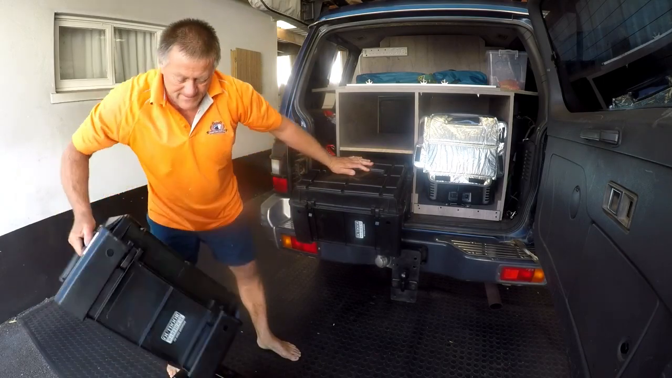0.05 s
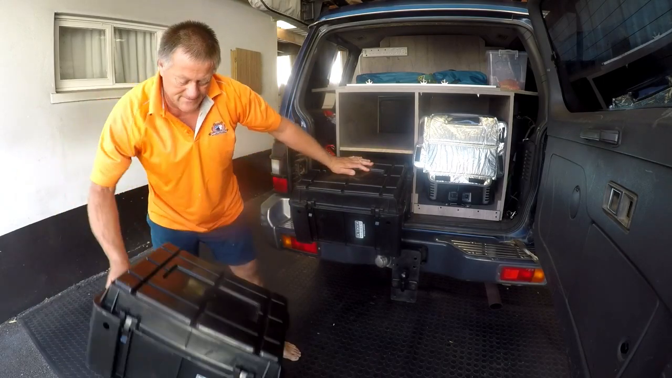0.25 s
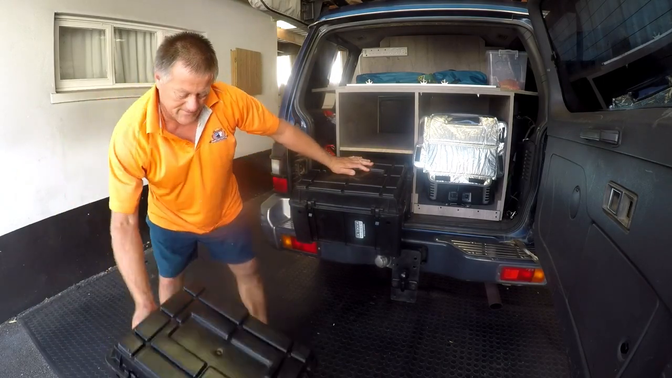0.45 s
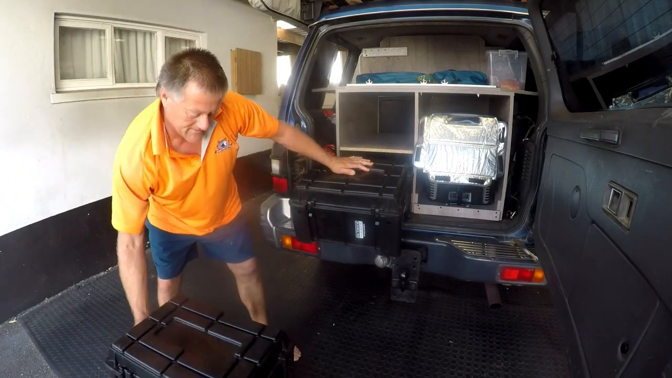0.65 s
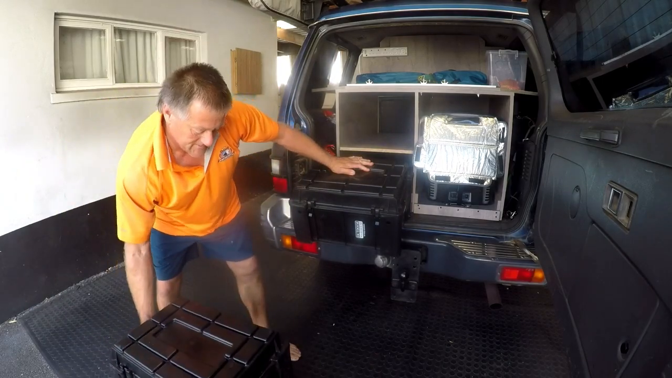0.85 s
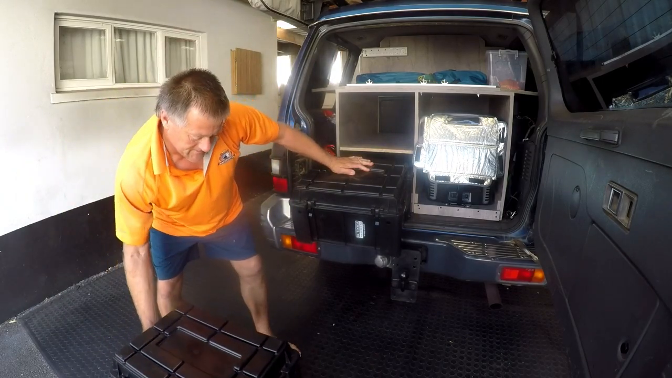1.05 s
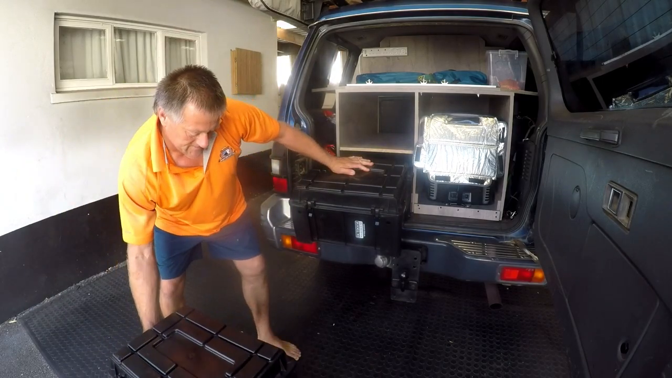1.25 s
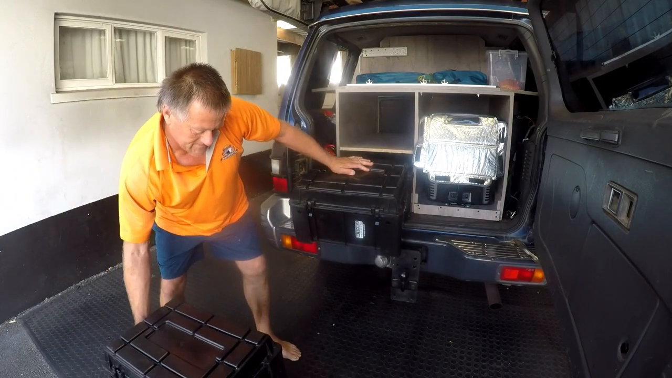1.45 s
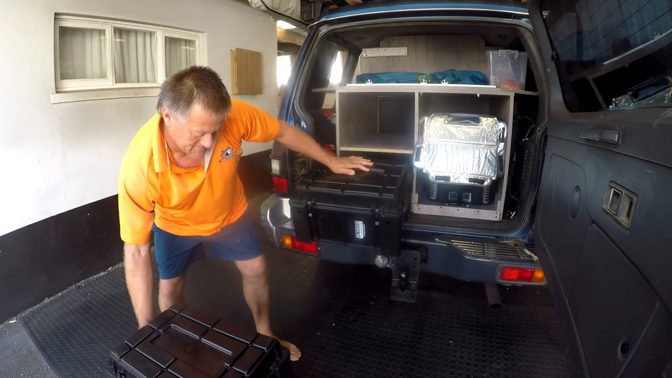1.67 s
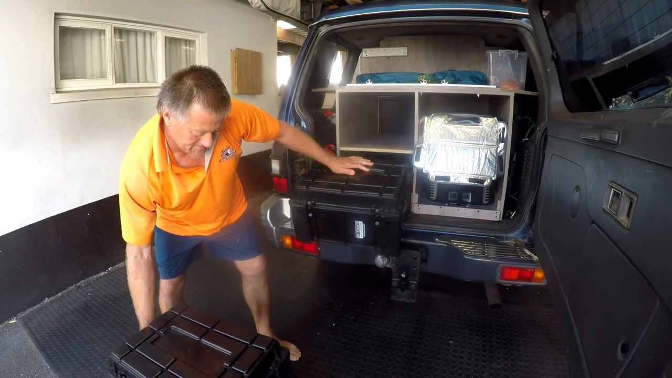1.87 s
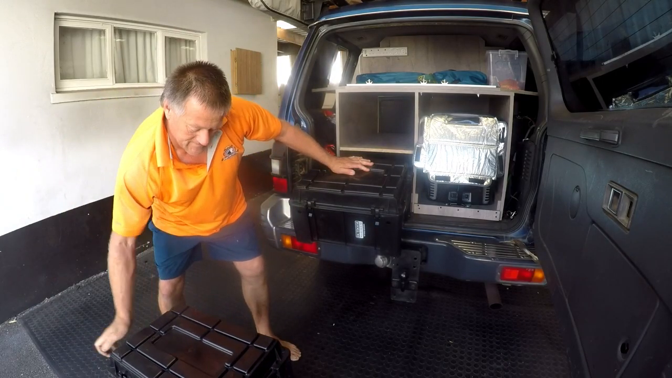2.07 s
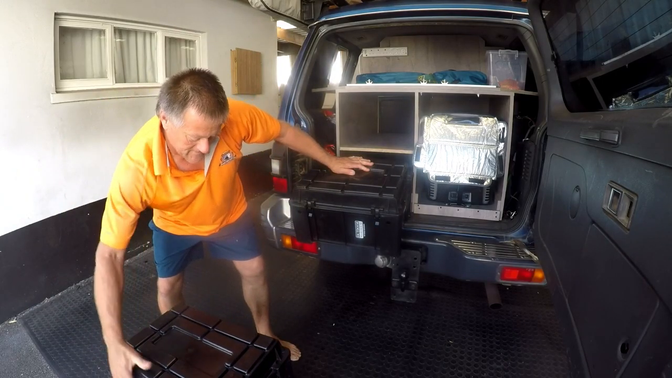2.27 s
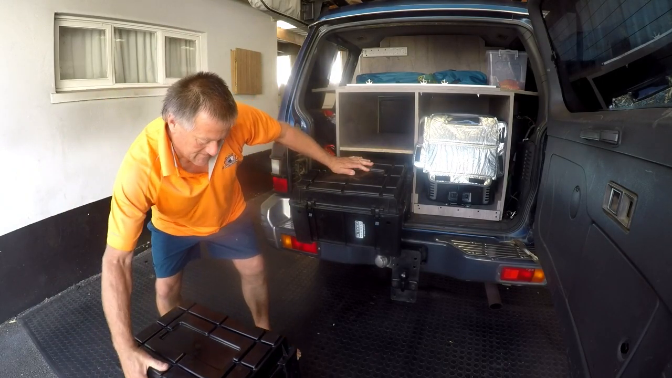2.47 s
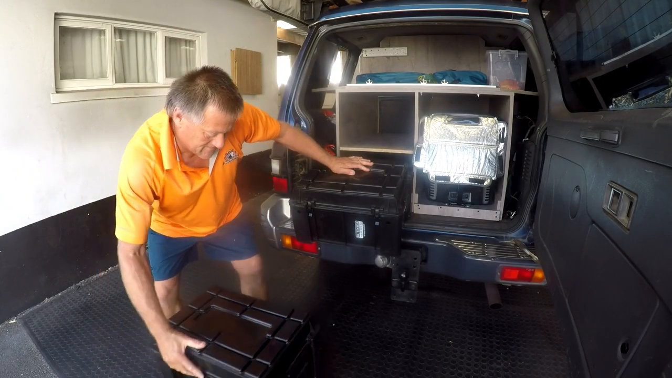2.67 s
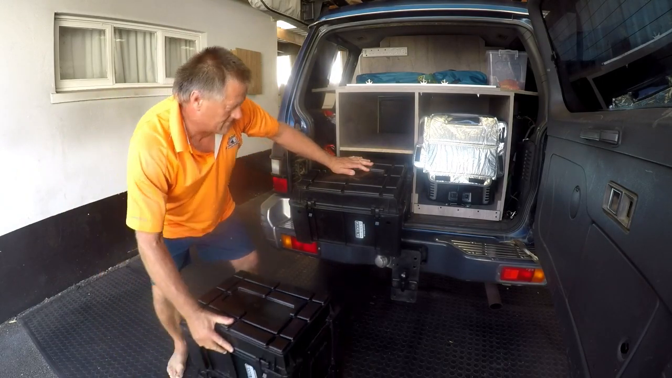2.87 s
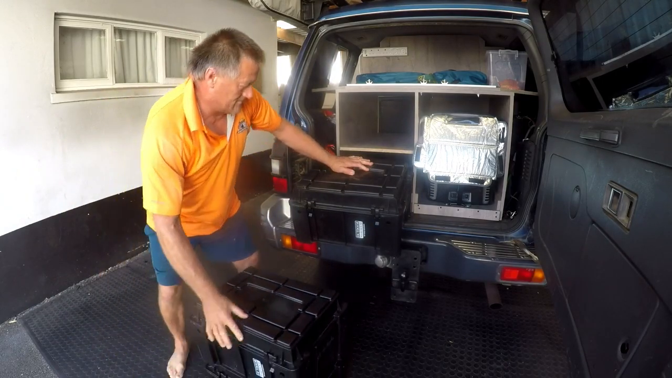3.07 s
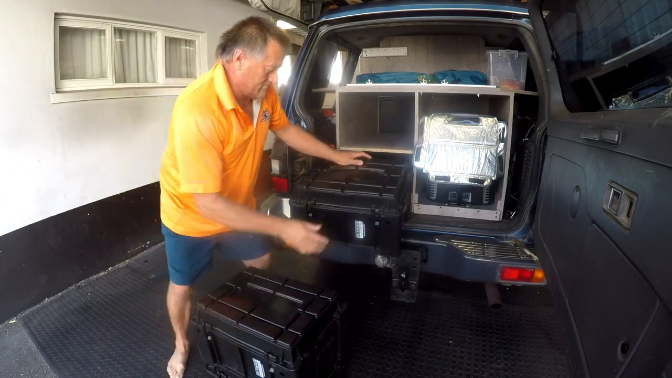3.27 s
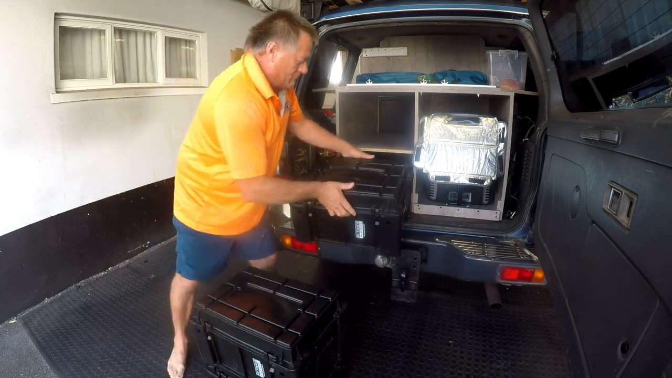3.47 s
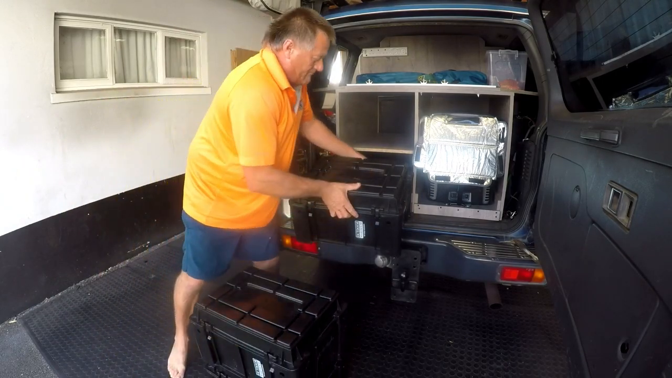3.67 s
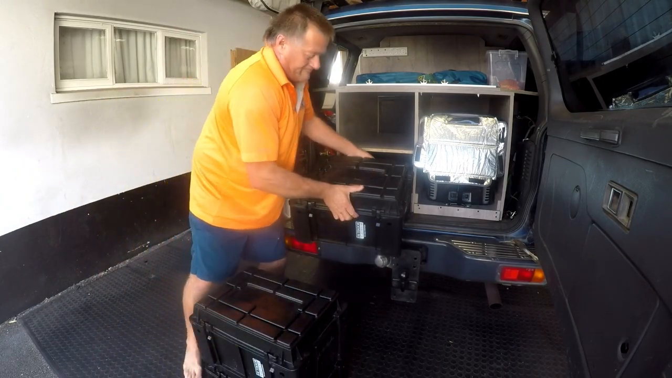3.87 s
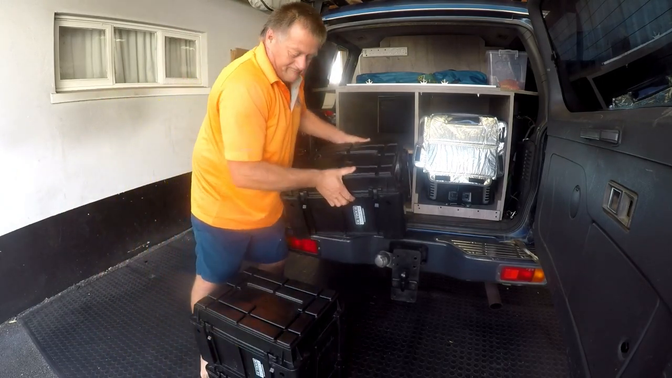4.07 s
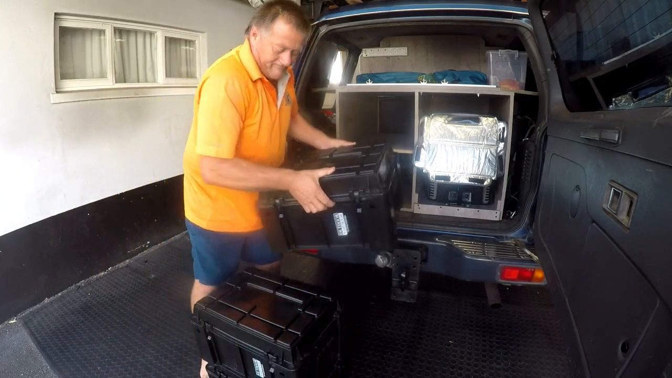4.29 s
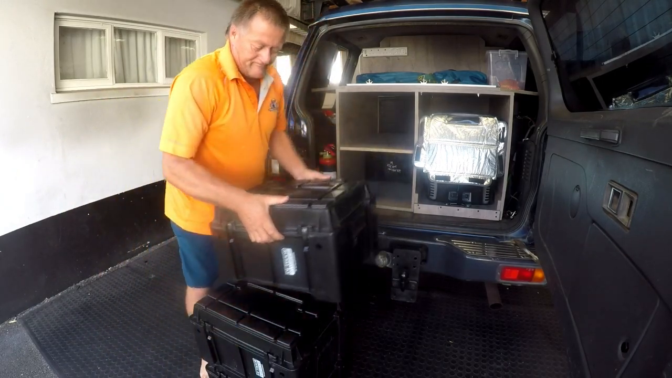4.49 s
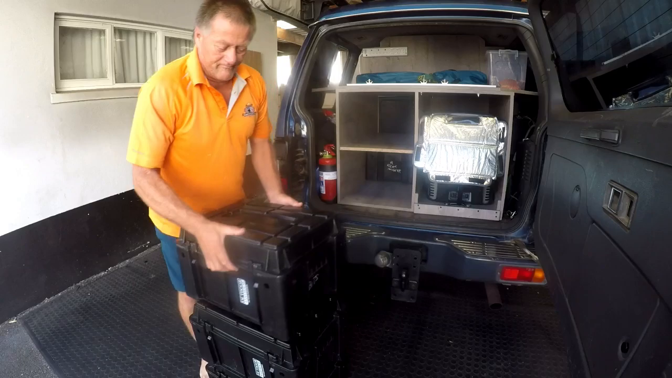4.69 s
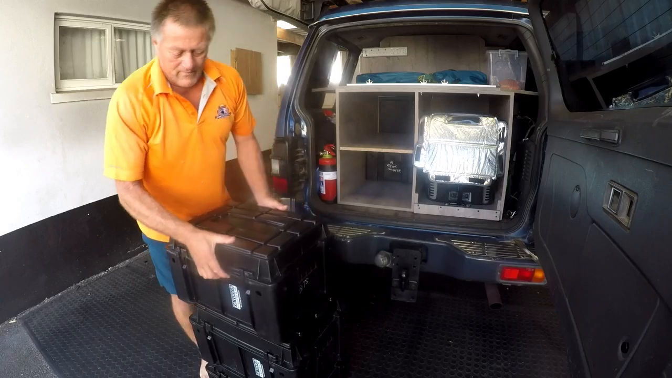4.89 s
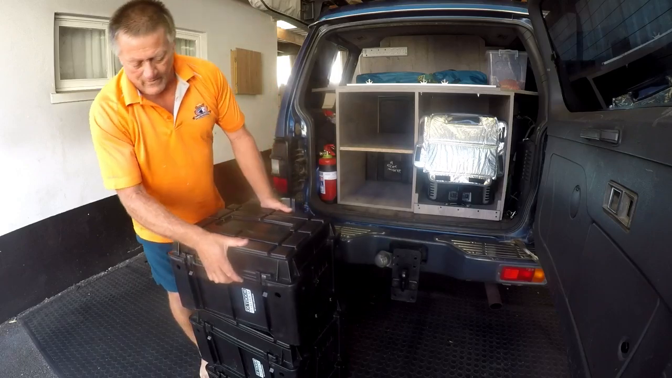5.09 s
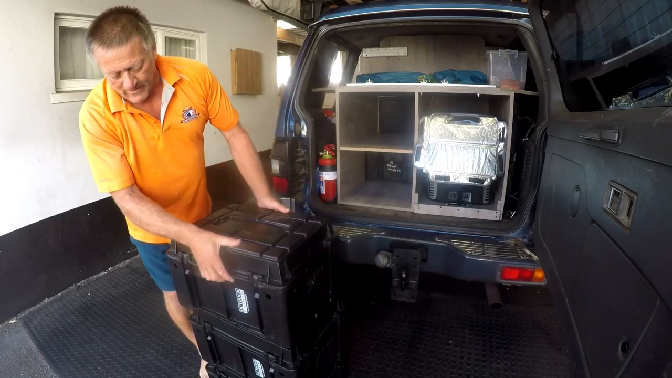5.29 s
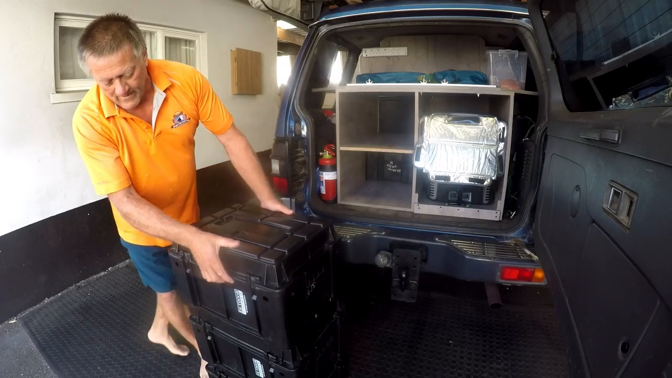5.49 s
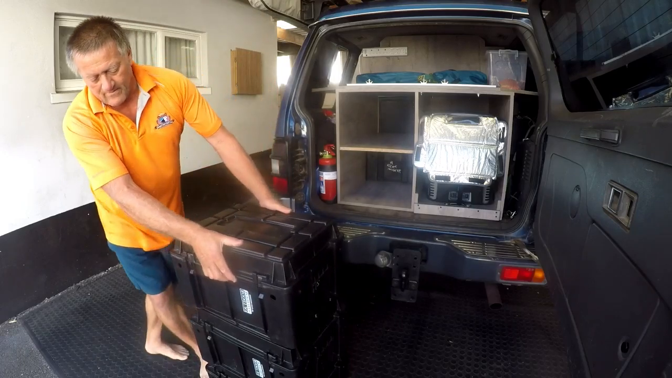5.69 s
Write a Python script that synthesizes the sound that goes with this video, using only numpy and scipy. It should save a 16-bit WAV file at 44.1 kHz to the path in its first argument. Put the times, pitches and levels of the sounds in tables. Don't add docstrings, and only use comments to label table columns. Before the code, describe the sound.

Low wind rumble, then a heavy thud and a quick run of hollow plastic knocks as a box is set down. It rocks softly, pauses, then scrapes and rattles over rubber ribs with a hard crack. Hands brush the lid while distant birds whistle thinly; a second box knocks into place and slides slightly. Close microphone, semi-open carport with brief reflections.

```python
import sys
import numpy as np
from scipy import signal
from scipy.fft import rfft, irfft, next_fast_len
from scipy.io import wavfile
from scipy.ndimage import uniform_filter1d, map_coordinates

SR = 44100
rng = np.random.default_rng(int(sys.argv[2]) if len(sys.argv) > 2 else 0)


def boost_factor(decibels):
    exponent = np.asarray(decibels, float) / 20
    return 10 ** exponent


def master(y):
    cut = np.clip(np.atleast_2d(y).T, -1, 1)
    pcm = np.round(cut * 32767)
    wavfile.write(sys.argv[1], SR, pcm.astype(np.int16))


N = 253161

# f/Hz, width/Hz, level/dB
HOLLOW_MODES = [(87.6, 27.3, -8), (127.67, 5.3, 8.5)]
# f/Hz, width/Hz, level/dB
LID_MODES = [(177.8, 18.4, -3.5), (232.5, 31.5, 2.5), (277, 75, -0.5)]
# f/Hz, width/Hz, level/dB
WALL_MODES = [(343, 50, 0), (370, 43.6, 0.5), (453.4, 71, -0.5), (610, 102, 1.5), (711, 76, -2)]
# f/Hz, width/Hz, level/dB
RIB_MODES = [(710, 370, -10), (1175, 71, -1.5), (1256, 34, -6), (1412, 48, -1), (1520, 770, -8)]
# f/Hz, density/(dB per Hz)
GRIT_SPECTRUM = [(1000, -46), (1700, -3), (2180, -8), (3490, -3), (4950, -7.5), (6650, -15.5), (7700, -23),
                 (13600, -41.5), (15400, -42)]
# f/Hz, density/(dB per Hz)
DUST_SPECTRUM = [(4500, -14), (7000, -7.5), (11000, -15.5), (15000, -23)]


def unit(x):
    return x / np.sqrt(np.mean(x ** 2) + 1e-20)


def peak(x):
    return x / np.max(np.abs(x))


def along(points, hz):
    f, v = np.transpose(points)
    return np.interp(np.log(hz + 1), np.log(f + 1), v)


def curves(rows, off=-120):
    s, *cols = np.transpose(rows)
    return [np.interp(np.arange(N) / SR, s, c, off, off) for c in cols]


def wobble(rate):
    knots = rng.standard_normal(int(N * rate / SR) + 4)
    return map_coordinates(knots, [np.arange(N) * rate / SR])


def filtered(x, response):
    m = next_fast_len(len(x) + SR // 4)
    return irfft(rfft(x, m) * response(np.fft.rfftfreq(m, 1 / SR)), m)[:len(x)]


def coloured(x, spectrum):
    return unit(filtered(x, lambda hz: boost_factor(along(spectrum, hz))))


def body(modes, spread_db=0, widen=1):
    gains = boost_factor(spread_db * rng.standard_normal(len(modes)))

    def response(f):
        total = 0
        for k, (centre, width, db) in enumerate(modes):
            damping = 1j * f * width * widen
            total = total + (-1) ** k * gains[k] * boost_factor(db) * damping / (centre ** 2 - f * f + damping)
        return total
    return response


def swell(s, db, rise, fall):
    t = np.arange(N) / SR - s
    return boost_factor(db) / np.cosh(np.clip(t / np.where(t < 0, rise, fall) * 2, -30, 30))


def place(out, s, burst):
    out[round(s * SR):][:len(burst)] += burst


def outdoors():
    # loudest at t/s, level/dB, rise/s
    gusts = [(0.14, -18.5, 0.085), (0.04, -45, 0.098), (0.28, -34, 0.13), (0.53, -27, 0.0098),
             (0.67, -27, 0.036), (1.12, -31, 0.087), (1.42, -36.5, 0.27), (1.741, -31, 0.045),
             (2.55, -43, 0.11), (2.801, -31, 0.068), (4.06, -40, 0.094), (4.38, -43, 0.16),
             (5.61, -39, 0.051), (3.3, -64, 0.2), (4.65, -49, 0.061), (3.0, -45, 0.071)]
    # f/Hz, density/(dB per Hz)
    gust_spectrum = [(8.8, -42), (15, 5.5), (38, 3.5), (54, 7), (104, -8.5), (248, -28), (330, -59),
                     (430, -70), (730, -120)]
    # t/s, level/dB
    hush_level = [(0, -52), (.45, -50), (2.2, -49.5), (3.3, -47.5), (4.5, -51), (5.74, -44.5)]
    # f/Hz, density/(dB per Hz)
    air_spectrum = [(60, -4), (90, -7), (150, -5), (300, -12), (600, -19.5), (1000, -21.5), (1600, -26),
                    (3000, -31), (5000, -35.5), (8000, -42), (15000, -51)]
    breeze_db, fall_over_rise = -39, 0.32
    wind = boost_factor(breeze_db) + sum(swell(s, db, rise, fall_over_rise * rise) for s, db, rise in gusts)
    lumps = boost_factor(2.4 * wobble(12))
    buffet = wind * unit(lumps * coloured(rng.standard_normal(N), gust_spectrum))
    hush = boost_factor(curves(hush_level, off=-43)[0] + 0.27 * wobble(25))
    return buffet + hush * coloured(rng.standard_normal(N), air_spectrum)


def slips(rate, spread_db):
    chance = rate / SR * boost_factor(3.3 * wobble(30))
    size_db = spread_db * np.minimum(rng.exponential(1, N), 2)
    return (rng.random(N) < chance) * np.sign(rng.standard_normal(N)) * boost_factor(size_db)


def whistle(note, flutter):
    hz, db = curves(note, off=-200)
    level = uniform_filter1d(boost_factor(db + 1.5 * wobble(110)), size=200)
    return level * np.sin(2 * np.pi * np.cumsum(hz * (1 + flutter * wobble(320))) / SR)


def drag():
    # t/s, speed as rib rattle level/dB, load as hollow drone over it/dB
    carrying = [
        [(0, -55, -8), (.06, -53.5, -17), (.21, -63, -16), (.3, -83, -8), (.48, -54, -12)],
    ]
    settling = [
        [(0.51, -19, -3), (0.542, -24.5, -7), (0.638, -26.5, 7.5), (0.684, -26, 15), (0.744, -24.5, 4.5),
         (0.772, -30.5, 2), (0.806, -16, -4.5), (1.0, -45, 26.5)],
        [(1.0, -41.5, 18), (1.162, -32.5, 14.5), (1.22, -44, 21.5), (1.25, -38.5, 5), (1.318, -40.5, 3),
         (1.406, -31.5, 14.5), (1.548, -51, 15), (1.6, -47, -1)],
        [(1.6, -45.5, 9), (1.672, -27.5, 13), (1.704, -31, 17.5), (1.714, -24, 11), (1.948, -51.5, 18.5),
         (2.044, -59.5, 32), (2.132, -82, 43), (2.25, -69, 21)],
    ]
    sliding = [
        [(2.35, -53, 29), (2.444, -44, 19), (2.49, -37, 6.5), (2.558, -26, 12), (2.7, -23, 6), (2.73, -26, 6.5),
         (2.808, -24, -12), (2.93, -26, -9.5), (3.2, -59.5, 10)],
        [(4.74, -44, 14), (4.756, -35.5, 20), (4.782, -21, 13), (4.812, -24.5, -15), (4.894, -41, 13),
         (5.068, -47.5, 9), (5.13, -52.5, 8), (5.194, -71, 36), (5.2, -56, 14)],
        [(5.25, -54, 17), (5.308, -51, -18), (5.332, -52, 14.5), (5.442, -57, 5), (5.456, -42, -39),
         (5.54, -40, 9), (5.62, -59, 23), (5.74, -46, -4)],
    ]
    # level/dB, growth with speed, share of load
    rubbing = [(-7.5, 0.96, 1), (-0.5, 1.04, 0.27), (-4, 1.073, 0.14), (-13, 1.04, 0.079),
               (-8.5, 0.86, 0.79)]
    # f/Hz, width/Hz, level/dB
    lone_lid_modes = [(182.4, 68, 0)]
    # t/s, f/Hz, level/dB
    squeak = [(1.2, 1550, -52), (1.25, 1500, -35), (1.275, 1450, -52)]
    usual_speed_db = -30

    force = slips(1300, spread_db=2.5)
    drone = filtered(force, body(HOLLOW_MODES))
    shell = filtered(force, body(LID_MODES + WALL_MODES))
    shell = filtered(shell, lambda f: 1 / (1 + 1j * f / 330))
    ribs = filtered(force, body(RIB_MODES, widen=1.84))
    ribs = filtered(ribs, body([(1042, 610, 0)]))
    grit = unit(slips(5000, spread_db=3.0)) + 0.5 * rng.standard_normal(N)
    grit = coloured(grit, GRIT_SPECTRUM)
    lone_lid = filtered(filtered(force, body(lone_lid_modes)), body(lone_lid_modes))
    layers = [unit(layer) for layer in (drone, shell, ribs, grit, lone_lid)]

    out = np.zeros(N)
    for rows in carrying + settling + sliding:
        speed_db, load_db = curves(rows, off=np.nan)
        for (db, grows, share), layer in zip(rubbing, layers):
            gain = boost_factor(db + usual_speed_db + grows * (speed_db - usual_speed_db) + share * load_db)
            out += uniform_filter1d(np.nan_to_num(gain), size=300) * layer
    return out + whistle(squeak, flutter=0.011)


def hands():
    # loudest at t/s, level/dB, rise/s, fall/s, brightness/dB
    strokes = [(0.05, -60.5, .1, 0.25, -12), (0.46, -67, .05, 0.015, -18), (3.292, -54.5, 0.092, 0.079, -6),
               (3.295, -62, .03, 0.033, 5), (3.43, -57, 0.026, 0.026, -11), (3.51, -62, 0.025, .04, -11),
               (3.46, -59, 0.17, 0.28, -5), (3.732, -60, 0.076, 0.036, -10),
               (3.906, -54.5, 0.12, 0.13, -6.5), (4.11, -65.5, 0.041, 0.054, -8),
               (5.33, -62, 0.11, 0.046, -23), (5.52, -51, 0.059, 0.034, -14)]
    # f/Hz, density/(dB per Hz)
    skin_spectrum = [(590, -41), (1000, -35), (1270, -6), (1380, -6), (1860, -7.5), (2720, -3.5),
                     (3000, -2.5), (4400, -5), (4930, -5.5), (7000, -14), (9100, -50), (15400, -120)]
    rustle = coloured(rng.standard_normal(N) * boost_factor(1.6 * wobble(53)), skin_spectrum)
    hiss = coloured(rng.standard_normal(N), DUST_SPECTRUM)
    out = np.zeros(N)
    for s, db, rise, fall, bright_db in strokes:
        out += swell(s, db, rise, fall) * (rustle + boost_factor(bright_db) * hiss)
    return out


def squeals():
    # loudest at t/s, level/dB, half length/s, f/Hz
    strokes = [(0.15, -65.5, 0.17, 1730), (0.21, -62, .02, 1410), (0.482, -53, 0.011, 1750),
               (3.29, -56, 0.032, 1420), (3.3, -58.5, 0.032, 2970), (3.3, -61, .03, 2520),
               (3.34, -59, .02, 1750), (3.51, -63, .02, 2460), (3.505, -64, .02, 5770),
               (3.72, -59, .035, 2380), (3.725, -61, .03, 3000), (3.9, -66, 0.052, 2320),
               (3.9, -63, .05, 3010), (3.9, -58, 0.054, 4850), (3.9, -66, .04, 6400),
               (5.47, -60, .04, 3500), (2.48, -40, 0.034, 1053), (2.5, -41, .04, 1400),
               (2.61, -30.5, .04, 1406), (2.57, -32, .04, 816), (5.11, -57, .04, 800)]
    sharpness_q = 26
    out = np.zeros(N + SR)
    t = np.arange(-SR // 5, SR // 5) / SR
    for s, db, half, hz in strokes:
        resonance = body([(hz, hz / sharpness_q, 0)])
        tone = unit(filtered(rng.standard_normal(len(t)), resonance))
        stroke = boost_factor(db) / np.cosh(np.clip(2 * t / half, -30, 30))
        out[round(s * SR) + SR // 20:][:len(t)] += stroke * tone
    return out[SR // 4:][:N]


def knocks():
    # hollow thud/dB, lid boom/dB, corner hardness/dB
    set_down = [(0.497, -20.5, -13, -11, 5.5), (0.505, -8.5, 6, 1.5, -18), (0.565, -29, -3, 17.5, 8.5),
                (0.644, -15.5, -2, 7, -1.5), (0.7, -33.5, -1, -3, 14.5), (0.736, -17.5, 11, 3, -5),
                (0.796, -16, 15.5, 3.5, -1), (0.809, -12.5, 13.5, 13, -16), (0.849, -8, 2.5, 1, -22),
                (1.012, -37, 26.5, 17.5, 2), (1.127, -34, 27, 4, 3), (1.236, -33, 12.5, -1, -20),
                (1.392, -32, 17, 8.5, 5), (1.624, -26.5, -13, 10, -9), (1.673, -17.5, -12, 10.5, -13),
                (1.711, -13, -10, -9, -22), (1.74, -18, -7, 8, -0.5), (2.016, -33, 17, 3.5, -14)]
    shoved = [(2.317, -22, 0, 6, -36), (2.346, -26, 0, 2, -36), (2.558, -12, 2, -12, -18),
              (2.457, -23, -13.5, -1, -10), (2.54, -18, 6, -2, -4), (2.549, -7, -3, -8, -12),
              (2.622, -11, -17, -2, -9), (2.68, -8, -3.5, -30, -10), (2.757, -8, -13, -10, -16),
              (2.867, -15.5, 1, -12, -9), (2.929, -19, -2, -16, -10), (3.429, -40, 4, 8, -6),
              (3.747, -39.5, -8.5, 4, -11)]
    stacked = [(4.73, -21.5, -1, 0, -3.5), (4.745, -20, -6, -14, -14), (4.776, -14, -19, -10, -6.5),
               (4.789, -13.5, 4, -12, -11), (4.823, -19, -6, -16, -10), (5.021, -37.5, 13, 2, -2.5),
               (5.065, -47, 22, 4, 6), (5.535, -27.5, -12, 6.5, -13)]
    edge_hz, edge_grows = 2170, 0.12
    click_db, click_grows = -10.5, 1
    out, t = np.zeros(N + SR), np.arange(SR // 3) / SR
    for s, db, thud_db, boom_db, hard_db in set_down + shoved + stacked:
        top_hz = edge_hz * boost_factor(edge_grows * hard_db)
        soft = lambda f: 1 / (1 + 1j * f / top_hz) ** 2
        noise = rng.standard_normal((2, len(t)))
        push = filtered(noise[0] * boost_factor(-60 * t / 0.062), soft)
        shove = np.exp(-t / 0.0022) * (1 - np.exp(-t / 0.00091)) + 0.62 * push
        wall_force = push + 0.41 * filtered(shove, soft)
        ring = peak(filtered(wall_force, body(WALL_MODES, 2.3, 3.74)))
        ring += boost_factor(thud_db - 3.0) * peak(filtered(shove, body(HOLLOW_MODES, 0.66, 1.05)))
        ring += boost_factor(boom_db - 2.5) * peak(filtered(shove, body(LID_MODES, 6.0, 0.45)))
        ring += boost_factor(hard_db + 5.5) * peak(filtered(push, body(RIB_MODES, 4, 2.6)))
        puff = boost_factor(-60 * t / 0.18) * (1 - np.exp(-t / 0.0012))
        click = peak(coloured(noise[1], GRIT_SPECTRUM) * puff)
        ring += boost_factor(click_grows * hard_db + click_db) * click
        place(out, s, boost_factor(db - 3.0) * ring)
    return out[:N]


def ticks():
    # t/s, peak/dB
    grains = [(0.497, -39), (0.6396, -43), (0.696, -26.5), (0.795, -45), (1.1353, -52), (1.3887, -48),
              (1.669, -38), (1.7359, -39), (2.3192, -38), (2.4587, -47), (2.524, -48), (2.5495, -50),
              (2.6428, -44), (2.6683, -31), (2.674, -36), (2.724, -31.5), (2.731, -36), (2.8678, -35),
              (2.9276, -39), (4.7755, -44)]
    # f/Hz, density/(dB per Hz)
    crack_spectrum = [(1000, -28), (2500, 5), (6000, 3), (10000, -12), (15000, -18)]
    t60_s = 0.018
    bursts, t = np.zeros(N + SR), np.arange(SR // 10) / SR
    for s, db in grains:
        place(bursts, s, boost_factor(db - 60 * t / t60_s))
    return bursts[:N] * coloured(rng.standard_normal(N), crack_spectrum)


def scuffs():
    # t/s, peak/dB
    bursts_of_dust = [(0.4972, -18), (0.565, -19.5), (0.6384, -19.5), (0.6935, -23), (0.7965, -36),
                      (2.5396, -49), (2.6428, -37), (4.777, -32), (2.313, -25.5), (2.6678, -42),
                      (2.929, -26)]
    t60_s, grit_db = 0.16, 8
    bursts, t = np.zeros(N + SR), np.arange(SR // 4) / SR
    for s, db in bursts_of_dust:
        place(bursts, s, boost_factor(db - 20.0 - 60 * t / t60_s) * (1 - np.exp(-t / 0.0019)))
    dust = coloured(rng.standard_normal(N), DUST_SPECTRUM)
    grit = coloured(rng.standard_normal(N), GRIT_SPECTRUM)
    return bursts[:N] * (dust + boost_factor(grit_db) * grit)


def bounces():
    # t/s, peak/dB, f/Hz
    landings = [(0.5, -1, 71), (0.524, -0.5, 78), (0.538, -18, 86), (0.698, -11, 89), (0.804, -16, 82.6),
                (1.128, -16.5, 85.5), (1.26, -22, 81), (1.357, -13.5, 103), (1.387, -17, 78),
                (1.676, -26, 94), (1.708, -8, 81), (1.749, -28, 89), (2.32, -36, 98), (2.555, -37, 88),
                (2.698, -7, 96.5), (2.864, -28, 98.5), (3.446, -23, 91), (4.74, -22, 77), (4.789, -35, 95),
                (4.93, -32, 85), (5.549, -38, 94.2)]
    t60_s = 0.14
    out, t = np.zeros(N + SR), np.arange(SR // 2) / SR
    for s, db, hz in landings:
        level = boost_factor(db + 2.5 - 60 * t / t60_s) * (1 - np.exp(-t / 0.0088))
        place(out, s, level * np.sin(2 * np.pi * hz * t))
    return out[:N]


def plucks():
    # t/s, peak/dB, f/Hz,
    # t60/s
    part_rings = [(0.508, -8, 343, 0.045), (0.734, -18.5, 483, 0.049), (0.796, -19.5, 515, 0.035),
                       (0.822, -16, 487, 0.064), (0.857, -11.5, 233.4, 0.073), (1.679, -10.5, 260, 0.036),
                       (1.721, -9.5, 238, 0.047), (1.735, -27, 1040, .03), (2.544, -13.5, 446, 0.056),
                       (2.55, -4, 522, 0.026), (2.549, -12.5, 776, 0.031), (2.566, -9, 595, 0.035),
                       (2.629, -7.5, 190, 0.043), (2.648, -11, 560, 0.057), (2.675, -23, 192, 0.02),
                       (2.686, -15.5, 131, 0.26), (2.573, -11.5, 128.6, 0.39), (2.732, -7.5, 491, 0.037),
                       (2.751, -17.5, 253, 0.063), (2.758, -12.5, 596, 0.055), (2.868, -15.5, 127.2, 0.33),
                       (2.959, -16.5, 503, 0.032), (2.972, -17, 480, 0.024),
                       (0.797, -17, 1650, .025), (0.799, -24, 3700, .025), (0.8135, -8, 240, .05),
                  (1.712, -14, 480, .035), (1.7115, -19, 1200, .03), (1.7225, -8, 190, .035),
                  (2.32, -12, 122, .11), (2.316, -16, 350, .04), (2.349, -17, 140, .1), (4.7745, -13, 440, .05),
                  (4.7775, -10, 580, .045), (4.789, -4, 200, .06), (4.7905, -13, 129, .37),
                  (4.7985, -12, 226, .38), (4.82, -19, 330, .1), (4.752, -23, 110, .15),
                  (3.4435, -19, 205, .035), (2.325, -30, 470, .1), (2.684, -22, 1050, .03),
                  (4.739, -18, 340, .08), (3.444, -40, 680, .04), (2.7245, -27, 3400, .018),
                  (2.726, -28, 2930, .015), (0.7365, -17, 1180, .03), (2.5, -26, 400, .06),
                  (2.59, -16, 400, .05), (2.669, -28, 3000, .015), (1.63, -30, 1050, .05),
                  (1.742, -12, 200, .05), (1.762, -12, 190, .07), (0.567, -20, 972, .025),
                  (0.641, -20, 1080, .025)]
    attack_s = 0.00085
    out, t = np.zeros(N + SR), np.arange(SR // 3) / SR
    for s, db, hz, t60 in part_rings:
        level = boost_factor(db + 3.0 - 60 * t / t60) * (1 - np.exp(-t / attack_s))
        place(out, s, level * np.sin(2 * np.pi * hz * t))
    return out[:N]


def snaps():
    # t/s, peak/dB, pitch scale
    lug_snaps = [
        (0.736, -15, 1.07),
        (1.652, -22, 0.98),
        (2.668, -16, 0.97),
        (2.725, -5.5, 0.97),
        (2.734, -11, 0.97),
        (2.753, -18, 0.99),
    ]
    # f/Hz, level/dB, t60/s
    lug_modes = [(1096, 2, 0.04), (1060, -4, 0.045), (1260, -13, 0.03), (1390, -10, 0.03), (1750, -16, .02),
                 (2270, -17, 0.018), (2560, -19, 0.018)]
    out, t = np.zeros(N + SR), np.arange(SR // 4) / SR
    for s, db, scale in lug_snaps:
        ring = np.zeros(len(t))
        for hz, level, t60 in lug_modes:
            decay = boost_factor(level + rng.normal(0, 2.6) - 60 * t / t60)
            ring += decay * np.sin(2 * np.pi * hz * scale * t)
        place(out, s, boost_factor(db + 1.5) * ring * (1 - np.exp(-t / 0.004)))
    return out[:N]


def birds():
    # start t/s, length/s, first f/Hz, last f/Hz, level/dB
    calls = [(3.495, 0.037, 6500, 5200, -68), (3.54, .035, 6030, 6830, -63),
             (3.617, 0.12, 7480, 5050, -57.5), (3.8, .09, 7600, 7650, -69), (3.985, 0.12, 7750, 5300, -65),
             (4.167, 0.13, 7700, 5240, -65.5), (4.51, 0.066, 6650, 5450, -66),
             (4.562, .026, 6400, 6150, -64), (4.596, .02, 8350, 8480, -70), (4.656, 0.05, 7250, 7100, -74),
             (5.19, 0.04, 8540, 8480, -77), (5.218, 0.08, 8450, 5900, -70), (5.56, .08, 7800, 7750, -74)]
    glide_at, glide_share = 0.4, 0.37
    glide_bend, glide_dip_db = 1.3, -2
    note_edge = 0.27
    out, shake, waver = np.zeros(N + SR), boost_factor(2.5 * wobble(70)), 1 + 0.011 * wobble(320)
    for s, length, first_hz, last_hz, db in calls:
        u = np.linspace(0, 1, round(length * SR))
        at = slice(round(s * SR), round(s * SR) + len(u))
        slid = np.clip((u - glide_at) / glide_share, 0, 1)
        hz = last_hz + (first_hz - last_hz) * (1 - slid) ** glide_bend
        level = boost_factor(db + glide_dip_db * np.sin(np.pi * slid)) * np.abs(np.sin(np.pi * u)) ** note_edge
        out[at] += level * shake[at] * np.sin(2 * np.pi * np.cumsum(hz * waver[at]) / SR)
    return out[:N]


def carport(x):
    # f/Hz, t60/s
    decay_times = [(100, 0.34), (500, 0.37), (2000, 0.26), (6000, 0.2), (12000, 0.27)]
    out, step = np.zeros(N + 2 * SR), SR // 4
    x, fade = np.pad(x, (step, 2 * step)), np.hanning(2 * step)
    for start in range(0, N + step, step):
        hz, t, z = signal.stft(rng.standard_normal(SR // 2), SR, nperseg=256)
        decay = boost_factor(-60 * t / along(decay_times, hz)[:, None])
        tail = signal.istft(z * decay, SR, nperseg=256)[1]
        wet = signal.fftconvolve(x[start:start + 2 * step] * fade, tail / np.linalg.norm(tail))
        out[start + 250:][:len(wet)] += wet
    return out[step:step + N]


def scene():
    hits = knocks() + plucks() + bounces() + scuffs()
    lug, rub, song = snaps(), drag(), birds()
    wet = carport(boost_factor(-4) * hits + boost_factor(-4.5) * lug + boost_factor(-13.0) * rub + boost_factor(-5) * song)
    near = hits + lug + rub + hands() + squeals() + ticks()
    return (near + song + wet + outdoors())[None]


def top_cut(x):
    return signal.sosfilt(signal.butter(12, 15520, fs=SR, output="sos"), x)


def record(dry):
    held = dry[0] / (1 + np.abs(dry[0]) ** 8) ** (1 / 8)
    top_hz = 15500
    mix = filtered(held, lambda hz: (hz < top_hz) / (1 + (hz / 15600) ** 40))[None]
    return top_cut(mix)


dry = scene()
out = record(dry)
master(out)
```